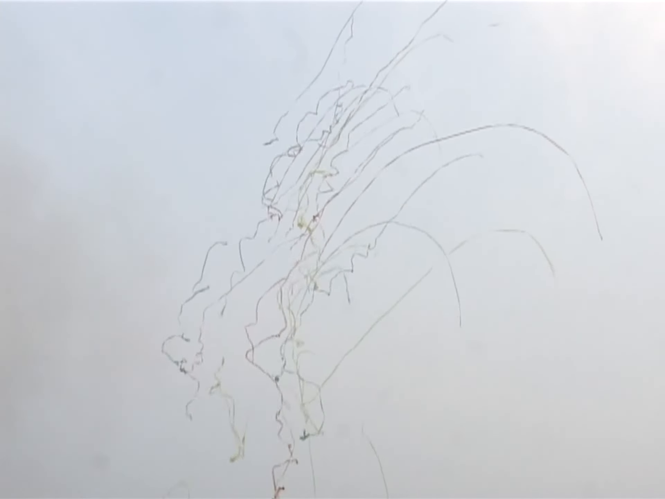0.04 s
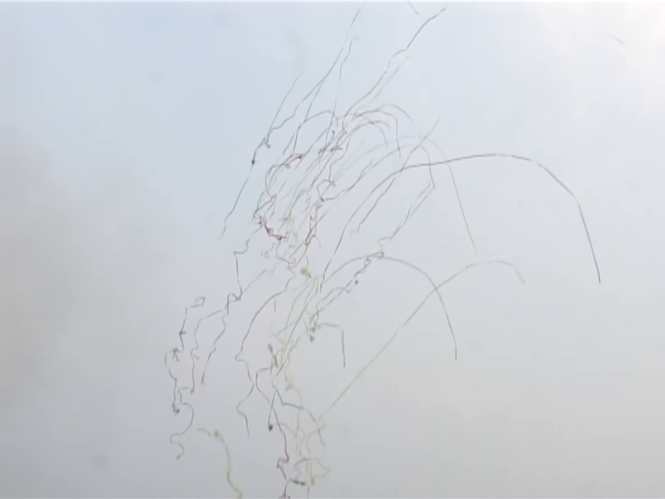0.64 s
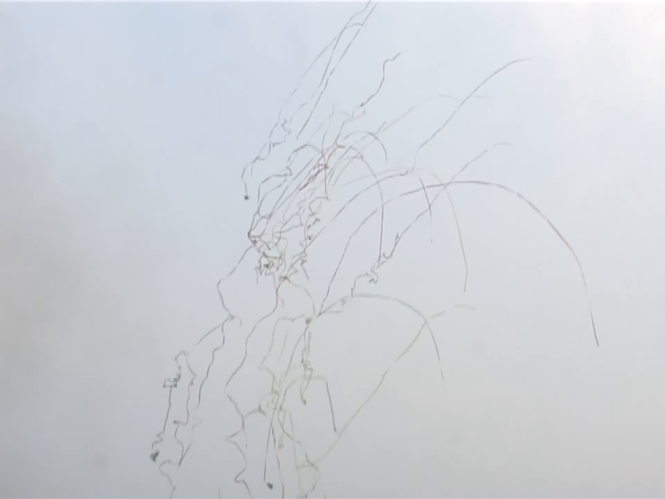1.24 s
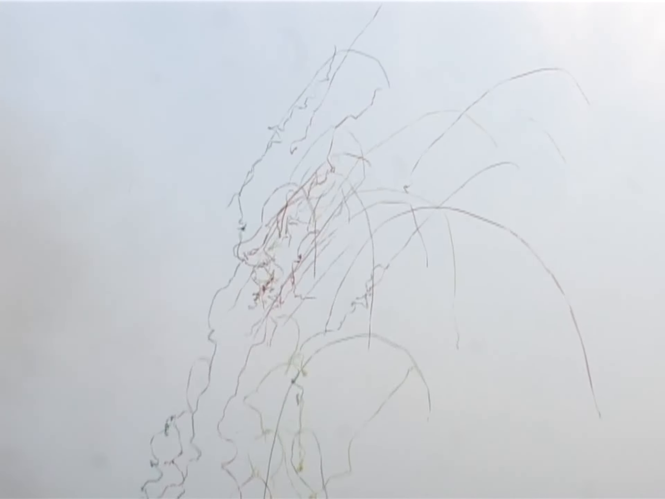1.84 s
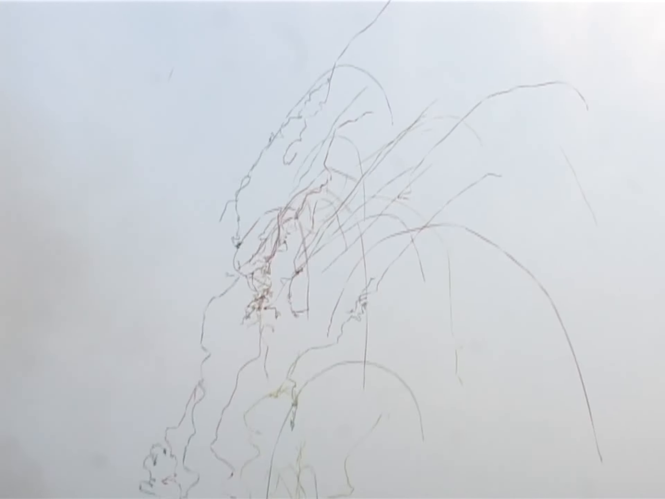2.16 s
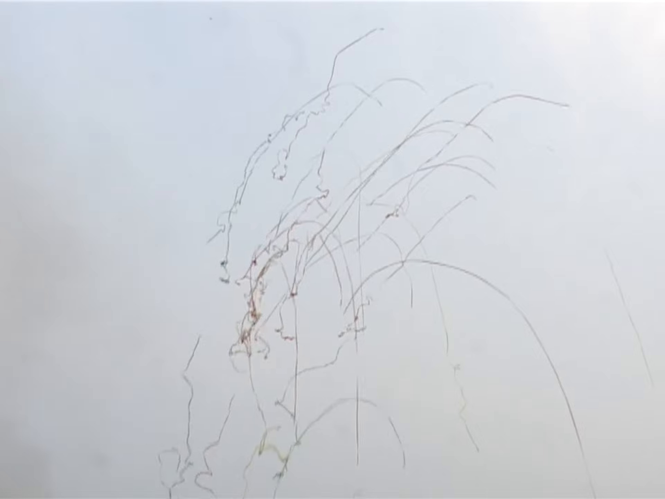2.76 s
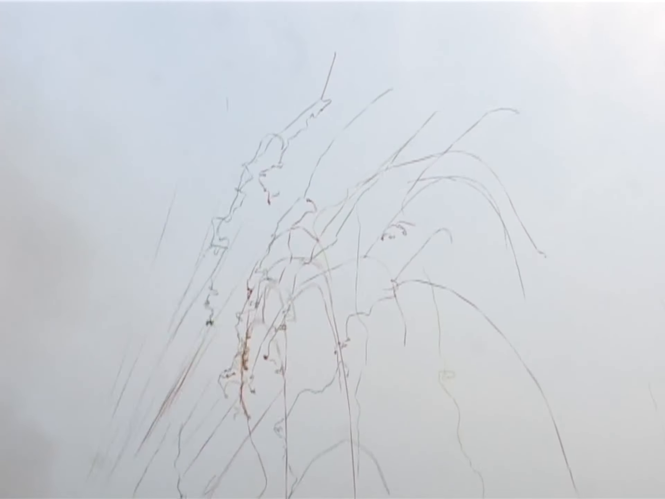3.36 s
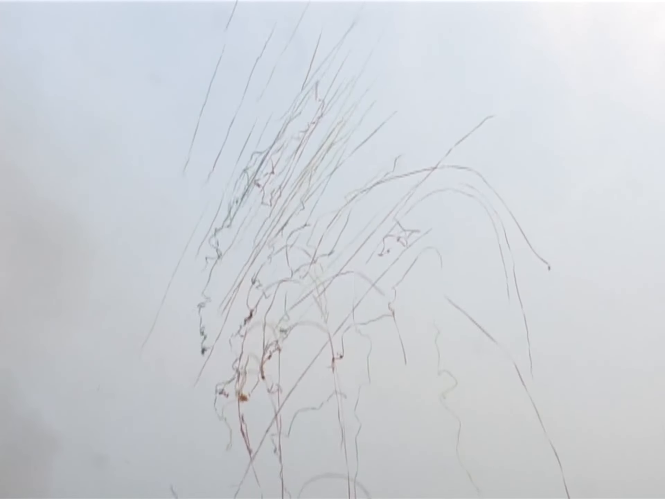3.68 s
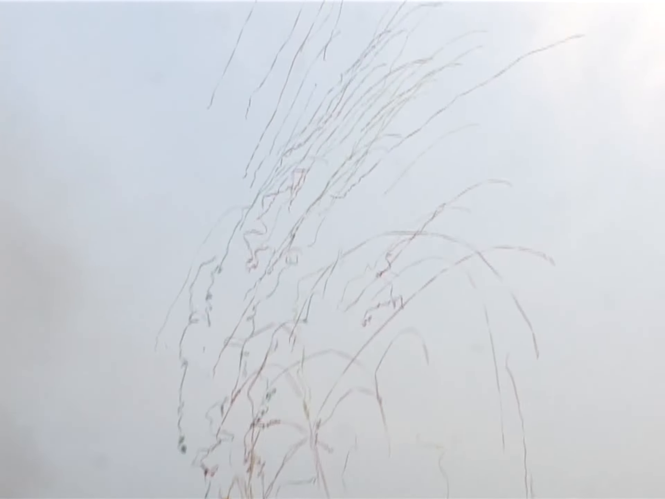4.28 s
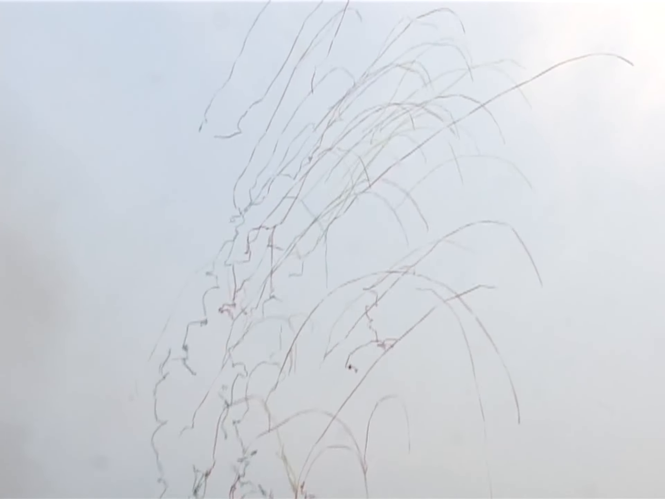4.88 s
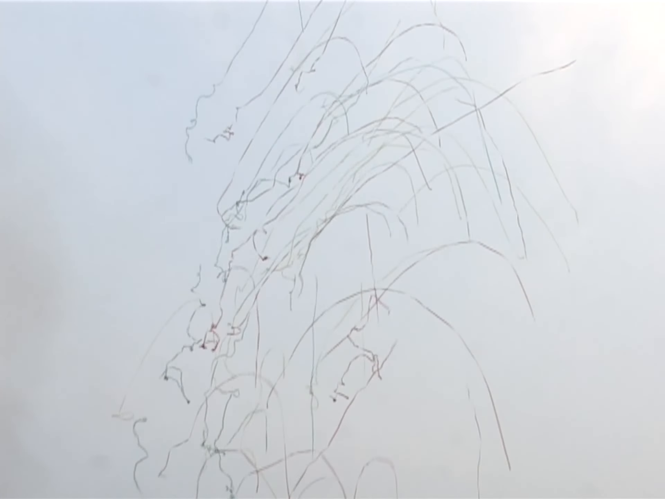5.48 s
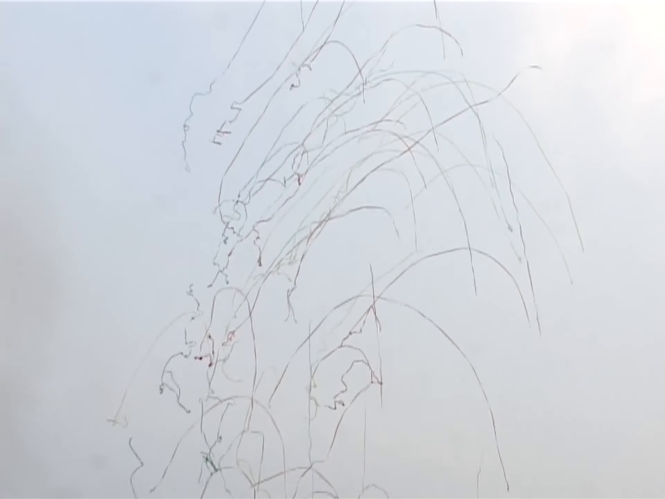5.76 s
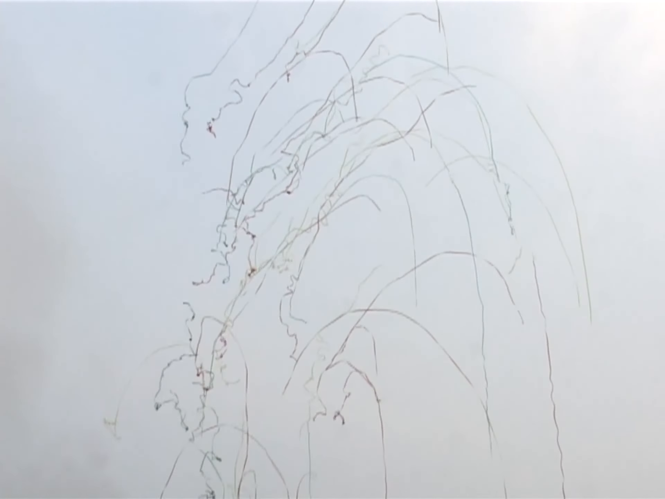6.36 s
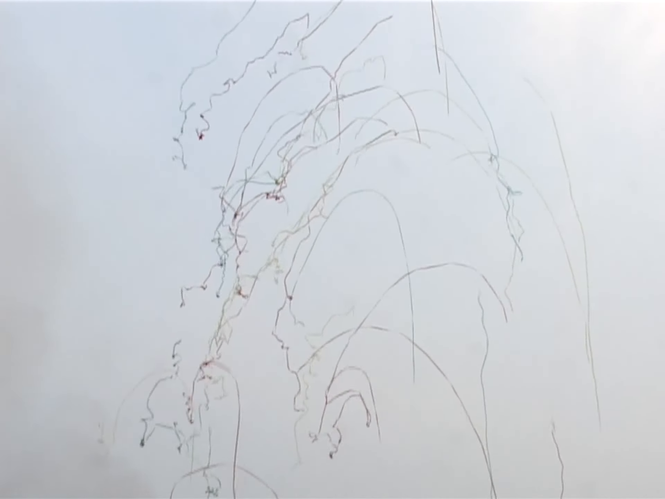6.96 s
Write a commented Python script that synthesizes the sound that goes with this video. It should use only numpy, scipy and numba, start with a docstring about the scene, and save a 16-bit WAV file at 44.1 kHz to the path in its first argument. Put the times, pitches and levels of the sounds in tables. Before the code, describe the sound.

A confetti firework fires two single shots and a rapid burst close by, trailed by crackling echoes, rumble and faint paper ticks.

```python
"""Two single bangs, then a quick salvo: a confetti firework battery close by in open country, in stereo.
Each shot spits gas, sends out a shock front, rings its cardboard tube and throws rushing paper streamers.
Near hedges smear the bang; walls return it as a row of sharp echoes over a fading rumble from trees
and ground. The fuse hisses, falling paper ticks, a bird and insects call far off.
A limiter holds the bangs down; their peaks still overload."""
import sys
import numpy as np
from scipy import signal
from scipy.fft import rfft, irfft, next_fast_len
from scipy.io import wavfile
from scipy.ndimage import uniform_filter1d
from numba import njit

SR = 44100
rng = np.random.default_rng(int(sys.argv[2]) if len(sys.argv) > 2 else 0)


def store_pcm(level_fs):
    """Save levels as 16-bit WAV."""
    pcm = np.round(np.clip(level_fs, -1, 1) * 32767).astype(np.int16)
    wavfile.write(sys.argv[1], SR, np.atleast_2d(pcm).T)


N = 309582
T = np.arange(N) / SR
TOP_HZ = 14700

# Noise spectra: freq_hz, density_db
AIR_SPECTRUM = [(15, -28), (25, -1.5), (103, -0.5), (145, -4), (179, -7.5), (430, -14.5), (796, -10.5),
                (1450, -9), (1850, -16), (5130, -30), (6700, -36), (11700, -34), (14500, -49)]
FUSE_SPECTRUM = [(1500, -12), (2600, 12), (3250, 15), (4000, 2.5), (4900, 6.5), (6000, -30), (9000, -11),
                 (14000, -57)]
STREAMER_SPECTRUM = [(500, 5.5), (2000, 0), (3200, 0.5), (5500, 2), (8000, -5.5), (11000, -11.5),
                     (14500, -22)]
LEAD_IN_SPECTRUM = [(100, -9), (450, 1.5), (1100, 3), (2500, 3.5), (7000, -4.5), (10000, -3), (14000, -12)]
SPIT_SPECTRUM = [(100, 1), (450, 1), (1100, 2), (2500, -6.5), (7000, -15.5), (14000, -23)]
TRUNK_SPECTRUM = [(300, -7), (900, 5.5), (2500, -13), (5000, -25)]
# Stereo width: freq_hz, side_minus_mid_db
AIR_WIDTH = [(60, -4.5), (110, -11.5), (200, -8), (370, -6.5), (680, -5), (1260, -11), (2310, 2.5),
             (4240, -0.5), (7800, -1.5), (14300, 2)]
SCATTER_WIDTH = [(60, -21), (110, -19), (200, -11), (370, -12.5), (680, -8), (1260, -6.5), (2310, 2.5),
                 (4240, 2), (7800, -2), (14300, 1)]
# Slow level curves: time_s, gain_db
BREEZE_BASS = [(0, 1), (5.7, -6), (6.3, 1), (7.0, 1)]
INSECT_CURVE = [(0, 1.5), (3, 2.5), (4.6, 2.5), (6, 2), (6.9, 5.5)]
# Far bird: start_s, level_db, start_pitch_hz
BIRD_CALLS = [(2.934, -47, 1930), (5.135, -50, 2005), (5.36, -47.5, 1850), (5.795, -55, 2050),
              (6.136, -46, 2030), (6.457, -50, 2080), (6.618, -45.5, 2014), (6.895, -47.5, 1914)]
# Falling paper: start_s, level_db, low_hz, high_hz, pan_db (left minus right)
PAPER_TICKS = [(.031, -45.5, 3000, 5000, 2.5), (1.124, -30, 1610, 4200, 4), (3.062, -35, 2360, 6500, 4.5),
               (4.73, -31, 1524, 5200, 2), (4.763, -47, 2150, 3700, -2), (4.9298, -39, 1976, 6000, 1),
               (5.061, -44, 2390, 5050, 2.5), (5.087, -41, 4680, 7620, 2.5), (5.393, -49, 2980, 5500, 1),
               (5.5148, -34.5, 2000, 8900, 16), (5.555, -42, 3000, 5760, 2.5), (5.664, -49, 7400, 9000, 7),
               (5.753, -39.5, 2500, 7500, -3.5), (5.839, -40, 2200, 5000, 0.5), (5.969, -52, 2200, 4800, 1),
               (6.391, -37, 2200, 8900, 3.5)]
# Scatter from trees and ground: freq_hz, density_db, t60_s
RUMBLE_BANDS = [(31.1, -12, 0.94), (69.4, 7.5, 4), (126.2, 4.5, 3.05), (284.7, -1, 2.76),
                (383.5, -13.5, 3.8), (678, -5.5, 3.6), (980, -3, 3.33), (1619, 4, 3.1), (2240, 4.5, 2.44),
                (3280, -7, 3.7), (6900, -4.5, 2.8), (14000, -37, 0.974)]
# Stands of trees: delay_s, level_db, spread_s, low_hz, high_hz
TREE_STANDS = [(0.253, -13.5, 0.032, 750, 1350), (1.12, -28.5, 0.071, 650, 1200),
               (1.4, -31, .06, 650, 1200)]
# Near hedges and uneven ground: delay_s, level_db, pan_db, scatter_s, low_hz, high_hz
HEDGES = [(.003, -14.5, -1.5, 0.0042, 187, 800), (.038, -17, -4, 0.027, 260, 1100),
          (.054, -12.5, 3, 0.017, 190, 477), (0.138, -14.5, -3.5, 0.024, 187, 814)]
# Walls with a second, stepped-back face:
# delay_s, level_db, pan_db, low_hz, high_hz, ring_hz, treble_db, step_s, ground_db, ground_high_hz
WALL_ECHOES = [(0.1359, -7.5, 8.5, 600, 3000, 1116, 4.5, 0.00023, -9.5, 260),
               (0.379, -30, -1, 700, 2190, 1000, -25, 0.00092, -15, 193),
               (0.4468, -5.5, -3.5, 1400, 2550, 1140, -2, 0.00055, -11.5, 185),
               (.468, -27.5, -16.5, 700, 1600, 841, -35, 0.0015, -18.5, 191),
               (0.631, -26, -5.5, 561, 2399, 847, -3.5, 0.0018, -52, 200),
               (0.6685, -12.5, -8.5, 1130, 3000, 1056, -5, 0.00094, -14, 303),
               (0.6785, -16.5, -6, 1194, 2240, 1600, -28, 0.00057, -17, 225),
               (0.706, -31, -7, 810, 2000, 1000, -25, 0.00099, -47, 200),
               (0.7446, -17, -4, 875, 3440, 872, -19, 0.001277, -29, 202.4),
               (.803, -32, -4.5, 754, 1990, 950, -30, .0011, -57, 200),
               (0.906, -26.5, -2.5, 894, 2324, 1100, -28, 0.00099, -36, 195.5),
               (0.911, -16, 8.5, 1130, 2020, 1384, -45, 0.00076, -44, 198)]
# Brief hisses just before a bang: end_s, length_s, level_db
LEAD_IN_HISSES = [(0.228, 0.026, -22), (1.44, 0.011, -16), (3.216, 0.025, -21.5)]
# Cardboard tubes and their box: freq_hz, level_db, t60_s
TUBE_MODES = [(83.5, -25, 0.051), (266, -30.5, 0.035), (444, -9.5, 0.0049), (883, -19, 0.021),
              (2135, -24, 0.014)]
# Shots: start_s, strength_db, push_s, spit_db, to_near_wall_db, to_hedges_db, to_far_walls_db, pitch_ratio
BATTERY_SHOTS = [(0.2325, -1.5, 0.00029, -9.5, -1.5, 5, -0.5, 1.095),
                 (1.4408, -8.5, 0.00047, -11, -3.5, -3, -9, 1),
                 (3.2200, -6.5, 0.00023, -16, -27, -19, -10, 1.54),
                 (3.2230, -30, 0.00035, -8, -16, -2, -21, 0.58),
                 (3.2275, -13.5, 0.00068, -11, -10.5, -5, -20, 1.6),
                 (3.2440, -11, 0.00049, -20, -17, -12, -11.5, 1.1),
                 (3.265, 1, 0.00035, -23, -5, -7, 3, 1.02),
                 (3.2925, -8.5, 0.00047, -18.5, -9, -14, -2.5, 1.22),
                 (3.3078, -10.5, 0.00066, -39, -13, -6, -7, 1.2)]


def undb(db):
    """Decibels to gain."""
    return 10 ** (np.asarray(db) / 20)


def unit(x):
    """Scale to rms 1."""
    return x / np.sqrt(np.mean(x ** 2))


def add(out, start_s, x):
    """Mix x into out."""
    i = int(round(start_s * SR))
    out[..., i:i + x.shape[-1]] += x[..., :out.shape[-1] - i]


def band(x, low_hz, high_hz, order=2):
    """Causal band-pass; upper edge at least 10 % above the lower."""
    high_hz = min(max(high_hz, 1.1 * low_hz), .45 * SR)
    return signal.sosfilt(signal.butter(order, [low_hz, high_hz], "band", fs=SR, output="sos"), x)


def lowpass(x, high_hz, order=2):
    """Causal low-pass."""
    return signal.sosfilt(signal.butter(order, high_hz, fs=SR, output="sos"), x)


def colour(x, spectrum):
    """Shape x by (freq_hz, gain_db) points on a log-frequency axis."""
    size = next_fast_len(x.shape[-1])
    hz, db = np.transpose(spectrum)
    bins_hz = np.arange(size // 2 + 1) * SR / size
    gain = undb(np.interp(np.log(bins_hz + 1), np.log(hz), db))
    return irfft(rfft(x, size) * gain, size)[..., :x.shape[-1]]


def wide_noise(width, size=N):
    """Diffuse stereo noise: channels alike in the bass, unlike in the treble."""
    mid, side = rng.standard_normal((2, size))
    side = colour(side, width)
    flatten = [(hz, -10 * np.log10(1 + undb(2 * db))) for hz, db in width]
    return colour(np.array([mid + side, mid - side]), flatten)


def walk(rate_hz, size=N):
    """Random wander, spread near 1."""
    knots = rng.standard_normal(int(size / SR * rate_hz) + 2)
    return np.interp(np.arange(size) / SR * rate_hz, np.arange(len(knots)), knots)


def place(x, pan_db):
    """Mono to stereo: louder and slightly earlier on the nearer side."""
    t = T[:len(x)]
    lag_s = np.round(np.clip(pan_db, -6, 6)) / SR
    return np.array([undb(side * pan_db / 2) * np.interp(t + side * lag_s / 2, t, x, left=0)
                     for side in (1, -1)])


@njit
def follow(x, release):
    """Peak follower: instant rise, exponential fall."""
    envelope, peak = np.empty(len(x)), 0.
    for i in range(len(x)):
        peak = max(x[i], peak * release)
        envelope[i] = peak
    return envelope


def air(level_db=-49.5, flicker_db=1.44, breeze_hz=110):
    """Distant murmur of the land; the bass follows the breeze."""
    murmur = unit(colour(wide_noise(AIR_WIDTH), AIR_SPECTRUM)) * undb(level_db - flicker_db * walk(22))
    bass = signal.sosfiltfilt(signal.butter(2, breeze_hz, fs=SR, output="sos"), murmur)
    return murmur + bass * (undb(np.interp(T, *np.transpose(BREEZE_BASS))) - 1)


def insects(pitch_hz=6690, throb_hz=15, throb_db=3, core_db=-2, base_db=-61):
    """A band of insect song with a narrower, shrill core that throbs unevenly."""
    phase = 2 * np.pi * np.cumsum(throb_hz * (1 + .193 * walk(8.7))) / SR
    chorus, core = (unit(band(wide_noise(AIR_WIDTH), pitch_hz * (1 - spread), pitch_hz * (1 + spread)))
                    for spread in (.099, .015))
    song = unit(chorus + core * undb(core_db + throb_db * np.sin(phase)))
    return song * undb(base_db + np.interp(T, *np.transpose(INSECT_CURVE)) - .4 * walk(3.04))


def bird(call_s=.087, fall_ratio=.3, jitter_ratio=.085, rasp_db=4, throat_hz=1700, blur_s=.0027):
    """Hoarse falling calls through a throat resonance, blurred by distance."""
    calls, t = np.zeros(N), T[:int(call_s * SR)]
    for start_s, db, start_hz in BIRD_CALLS:
        pitch_hz = start_hz * (1 - fall_ratio * t / call_s + jitter_ratio * walk(701, len(t)))
        swell = undb(db + rasp_db * walk(208, len(t))) * np.sin(np.pi * t / call_s)
        add(calls, start_s, swell * np.sin(2 * np.pi * np.cumsum(pitch_hz) / SR))
    voiced = band(calls, .78 * throat_hz, 1.22 * throat_hz, order=1)
    blur = rng.standard_normal((2, SR // 4)) * np.exp(-T[:SR // 4] / blur_s)
    return signal.fftconvolve(voiced[None], blur / np.linalg.norm(blur[0]))[:, :N]


def paper_ticks(decay_s=.0028, gain_db=3):
    """Short, dry snaps of falling paper."""
    out, t = np.zeros((2, N)), T[:SR // 20]
    for start_s, db, low_hz, high_hz, pan_db in PAPER_TICKS:
        snap = band(rng.standard_normal(len(t)) * np.exp(-t / decay_s), low_hz, high_hz, order=4)
        add(out, start_s, place(undb(db + gain_db) * snap / np.abs(snap).max(), pan_db))
    return out


def fuse(peak_s=2.28, peak_db=-50, rise_db_per_s=17.5, fall_db_per_s=10, end_s=3.25, sputter_db=1.5):
    """The fuse burns towards the salvo: a hollow hiss that swells and fades."""
    since_s = T - peak_s
    level_db = peak_db + np.minimum(rise_db_per_s * since_s, -fall_db_per_s * since_s)
    hiss = unit(colour(wide_noise(AIR_WIDTH), FUSE_SPECTRUM))
    return hiss * undb(level_db + sputter_db * walk(29.66)) * (T < end_s)


def rumble(build_s=.045, patchy_db=2.5, trunks_per_s=70, crackle_db=-3, gain_db=-48):
    """Response of countless small reflectors: trunks crackle, each band decays at its own rate."""
    t = T[:2 * SR]
    wash = wide_noise(SCATTER_WIDTH, len(t)) * undb(patchy_db * walk(250, len(t)))
    trunks = (rng.random(len(t)) < trunks_per_s / SR) * rng.standard_normal(len(t))
    crackle = undb(crackle_db) * colour(unit(trunks), TRUNK_SPECTRUM)
    bins_hz, frame_s, frames = signal.stft(wash + crackle, SR, nperseg=1024)
    hz, db, t60_s = np.transpose(RUMBLE_BANDS)
    db, t60_s = (np.interp(np.log(bins_hz + 1), np.log(hz), column)[:, None] for column in (db, t60_s))
    tail = signal.istft(frames * undb(db - 60 * frame_s / t60_s), SR)[1][:, :len(t)]
    return undb(gain_db) * tail * (1 - np.exp(-(t / build_s) ** 2))


def woods(grain_db=4):
    """Response of distant stands of trees: one grainy swell each."""
    out, t = np.zeros((2, 2 * SR)), T[:2 * SR]
    for delay_s, db, spread_s, low_hz, high_hz in TREE_STANDS:
        swell = np.exp(-((t - delay_s) / spread_s) ** 2 / 2) * undb(grain_db * walk(200, len(t)))
        scatter = wide_noise(SCATTER_WIDTH, len(t)) * swell
        out += undb(db) * band(scatter / np.linalg.norm(scatter[0]), low_hz, high_hz)
    return out


def hedges(twigs_db=-13, twigs_hz=(700, 2700), gain_db=-1.5):
    """Response of near hedges and ground: dull, smeared returns, brightened by twigs."""
    out, t = np.zeros((2, 2 * SR)), T[:SR // 6]
    for delay_s, db, pan_db, scatter_s, low_hz, high_hz in HEDGES:
        scatter = rng.standard_normal(len(t)) * np.exp(-t / scatter_s)
        smear = band(scatter, low_hz, high_hz, order=3) + undb(twigs_db) * band(scatter, *twigs_hz)
        add(out, delay_s, place(undb(db) * smear / np.linalg.norm(scatter), pan_db))
    return undb(gain_db) * out


def walls(from_s, to_s, step_db=-6, scatter_s=.006, scatter_db=-18, ring_db=-4, gain_db=-2):
    """Response of walls in a delay range: double return, scatter, hollow ring, thump along the ground."""
    out, t = np.zeros((2, 2 * SR)), T[:SR // 6]
    click = signal.unit_impulse(len(t))
    rows = [row for row in WALL_ECHOES if from_s <= row[0] < to_s]
    for delay_s, db, pan_db, low_hz, high_hz, ring_hz, treble_db, step_s, ground_db, ground_hz in rows:
        scatter = rng.standard_normal(len(t)) * np.exp(-t / scatter_s)
        scatter /= np.linalg.norm(scatter)
        faces = click + undb(step_db) * np.sinc((t - step_s) * SR)
        echo = undb(db) * faces + undb(scatter_db + db / 2) * scatter  # weak faces are the rough ones
        body = lowpass(band(echo, low_hz, TOP_HZ), high_hz, order=5)
        ring = undb(ring_db) * band(echo, .941 * ring_hz, 1.059 * ring_hz, order=1)
        treble = undb(treble_db) * band(echo, 4750, 8400)  # kept by flat faces
        thump = undb(ground_db + 6) * band(click, 80, ground_hz)
        add(out, delay_s, place(body + ring + treble, pan_db))
        add(out, delay_s + .00096, thump)  # the ground wave lags
    return undb(gain_db) * out


def streamers(gain_db=-20, rise_s=.061, braking_s=.17, echo_s=.72, echo_db=-25.5, pan_db=1.5):
    """Paper ribbons rush upward in step with each shot's strength and fade as the air brakes them."""
    envelope = (1 - np.exp(-(T / rise_s) ** 2)) * np.exp(-T / braking_s)
    power = np.zeros(N)
    for start_s, db, *_ in BATTERY_SHOTS:
        add(power, start_s, (undb(db + gain_db) * envelope) ** 2)
    add(power, echo_s, undb(2 * echo_db) * power)  # off the far walls
    crinkle = wide_noise(SCATTER_WIDTH) * undb(.5 * walk(1500))
    flutter = undb(2 * walk(180))
    rush = unit(colour(crinkle, STREAMER_SPECTRUM)) * flutter
    return rush * np.sqrt(power) * undb([[pan_db / 2], [-pan_db / 2]])


def lead_in_hiss(swell_db=14):
    """A brief bright hiss that swells just before a bang."""
    out = np.zeros(N)
    for end_s, length_s, db in LEAD_IN_HISSES:
        progress = T[:int(length_s * SR)] / length_s
        hiss = unit(colour(rng.standard_normal(SR // 10), LEAD_IN_SPECTRUM))[:len(progress)]
        add(out, end_s - length_s, undb(db + swell_db * (progress - 1)) * np.sqrt(progress) * hiss)
    return out


def spits(lead_s=.004, vent_db=-12, vent_s=.012, gain_db=5):
    """Gas spits past the plug just before each bang; the rest vents after it."""
    out, t = np.zeros(N), T[:SR // 25]
    envelope = np.where(t < lead_s, 1, undb(vent_db) * np.exp(-(t - lead_s) / vent_s))
    for start_s, _, _, spit_db, *_ in BATTERY_SHOTS:
        gas = unit(colour(rng.standard_normal(len(t)), SPIT_SPECTRUM))
        add(out, start_s - lead_s, undb(spit_db + gain_db) * envelope * gas)
    return out


def puffs(outflow_s=.0079, gain_db=-13, steepness=2.5):
    """Big charges push out a slow puff of gas: a deep thump."""
    out, age = np.zeros(N), T[:SR // 8] / outflow_s
    thump = np.e * age * (1 - age / 2) * np.exp(-age)
    for start_s, db, *_ in BATTERY_SHOTS:
        add(out, start_s, undb(gain_db + steepness * db) * thump)
    return out


def blast(push_s, pitch_ratio, front_s=12e-6, suction_db=-7, gain_db=16):
    """A shock front leaves the tube, suction follows as the gas overshoots, the tube rings."""
    t = T[:SR // 8]
    shock = (1 - t / push_s) * np.exp(-t / push_s) * (1 - np.exp(-t / front_s))
    after_push = np.maximum(t / push_s - .8, 0)  # in push lengths
    suction = undb(suction_db) * (1 - np.exp(-10 * after_push)) * np.exp(-after_push ** 2 / 2)
    ring = sum(undb(db - 60 * t / t60_s) * np.sin(2 * np.pi * hz * pitch_ratio * t)
               for hz, db, t60_s in TUBE_MODES)
    return undb(gain_db) * (shock - suction + ring)


def scene(spit_carry_db=-14, near_s=.25, far_s=.72):
    """Shots, echoes and background; the tubes fan out, so each feeds walls and hedges differently."""
    bangs, to_near, to_hedges, to_far = np.zeros((4, N))
    for start_s, db, push_s, _, near_db, hedge_db, far_db, pitch_ratio in BATTERY_SHOTS:
        wave = blast(push_s, pitch_ratio)
        for feed, feed_db in (bangs, db), (to_near, near_db), (to_hedges, hedge_db), (to_far, far_db):
            add(feed, start_s, undb(feed_db) * wave)
    spit = spits()
    near = walls(0, near_s)
    middle = walls(near_s, far_s) + rumble() + woods()
    far = walls(far_s, np.inf)
    paths = (to_near, near), (to_hedges, hedges()), (bangs, middle), (to_far, far)
    echoes = sum(signal.fftconvolve((feed + undb(spit_carry_db) * spit)[None], response)[:, :N]
                 for feed, response in paths)
    hiss = spit + lead_in_hiss()
    direct = place(bangs, pan_db=2.5) + place(hiss, pan_db=10.5) + place(puffs(), pan_db=2)
    return direct + echoes + streamers() + fuse() + paper_ticks() + bird() + air() + insects()


def record(dry, ceiling_db=13.5, release_s=.021, clip_level=.89, rolloff_hz=11000):
    """A fast limiter ducks on the bangs, the peaks still overload, the top is rounded off and cut."""
    ceiling = undb(ceiling_db)
    peak = follow(np.abs(dry).max(axis=0), np.exp(-1 / (release_s * SR)))
    gain = uniform_filter1d(ceiling / np.maximum(peak, ceiling), size=64)
    clipped = clip_level * np.tanh(dry * gain / clip_level)
    top_cut = signal.ellip(10, .1, 80, TOP_HZ, fs=SR, output="sos")
    return signal.sosfilt(top_cut, lowpass(clipped, rolloff_hz))


dry = scene()
out = record(dry)
store_pcm(out)
```